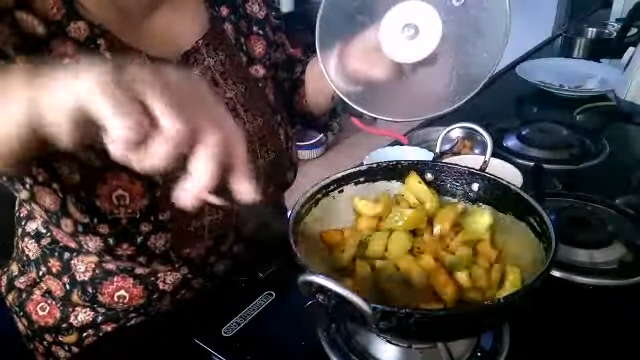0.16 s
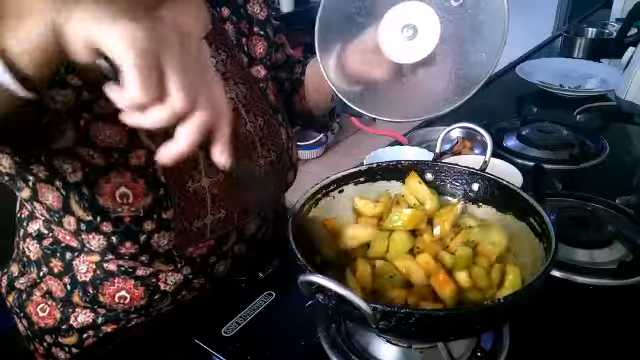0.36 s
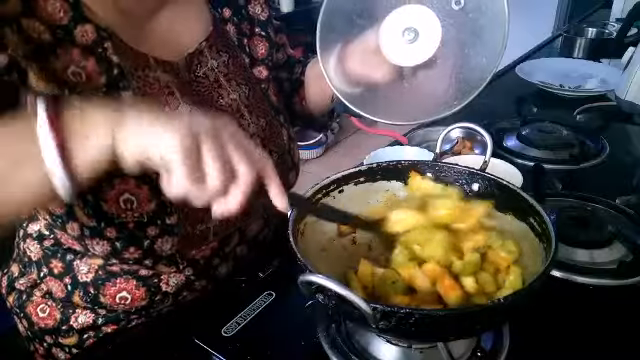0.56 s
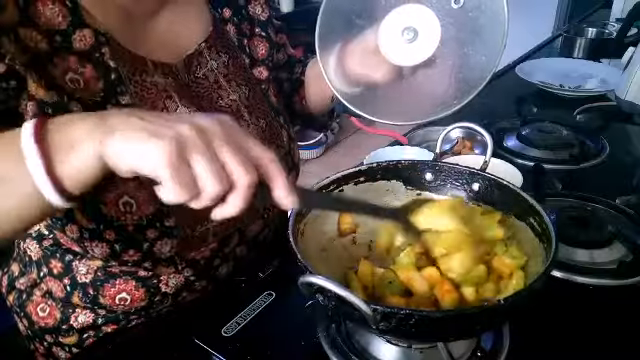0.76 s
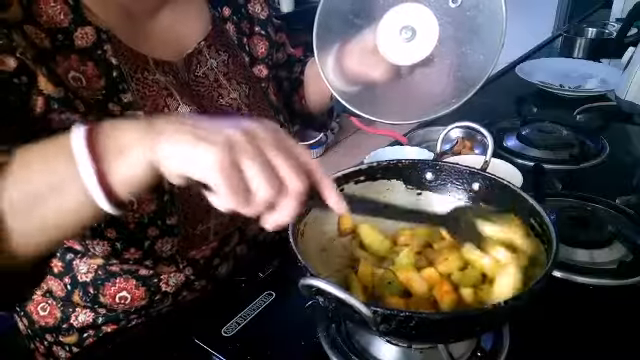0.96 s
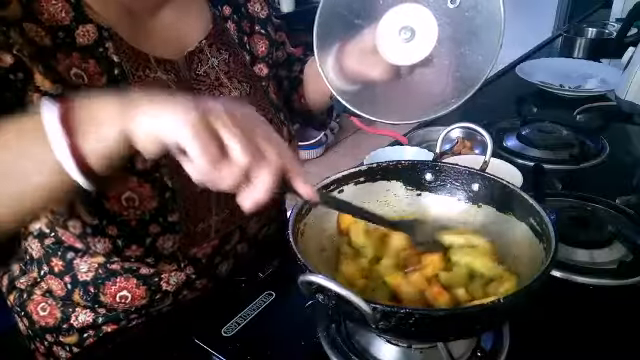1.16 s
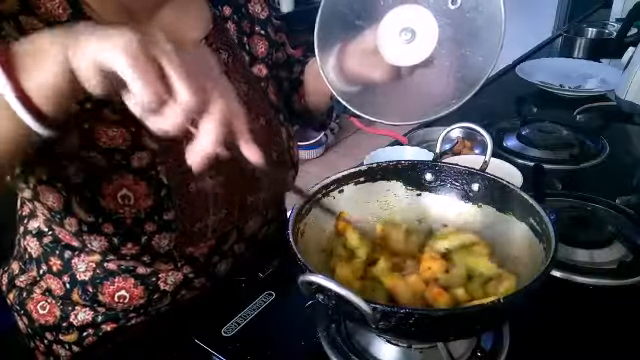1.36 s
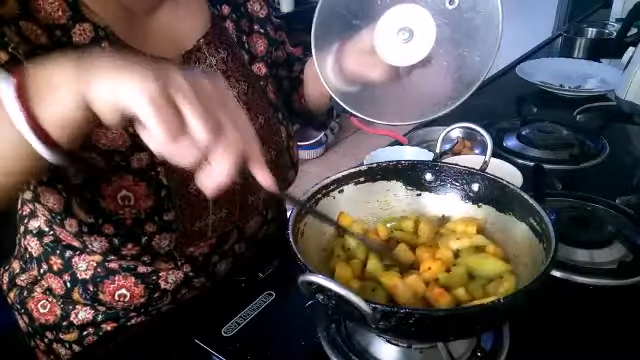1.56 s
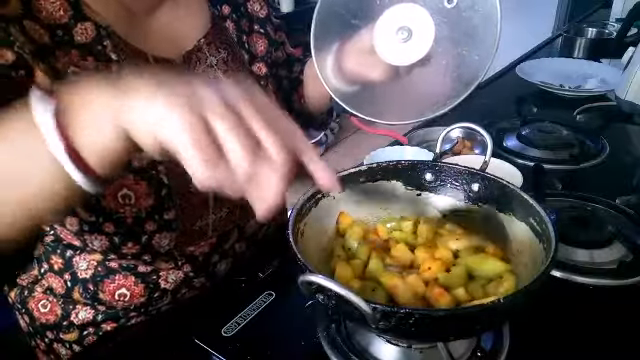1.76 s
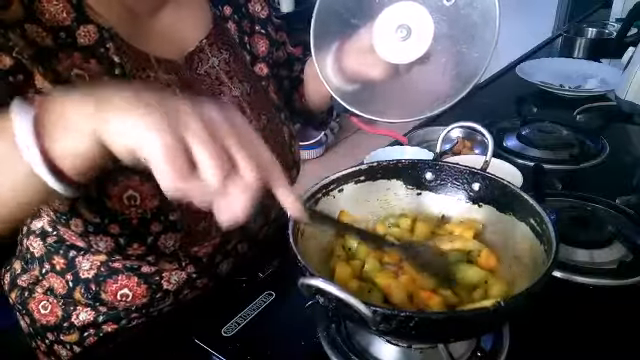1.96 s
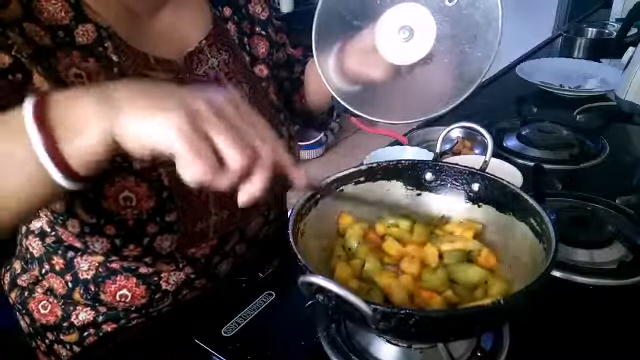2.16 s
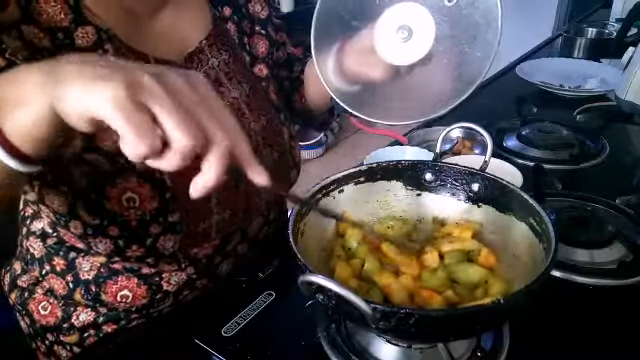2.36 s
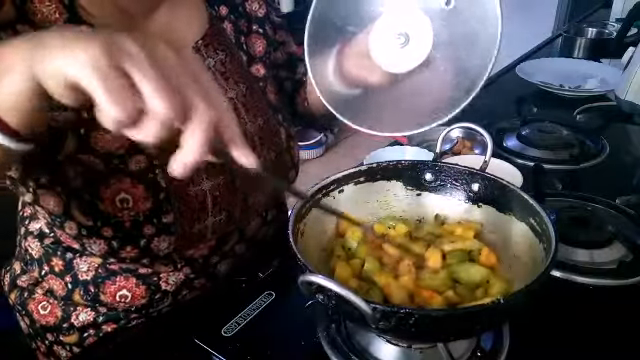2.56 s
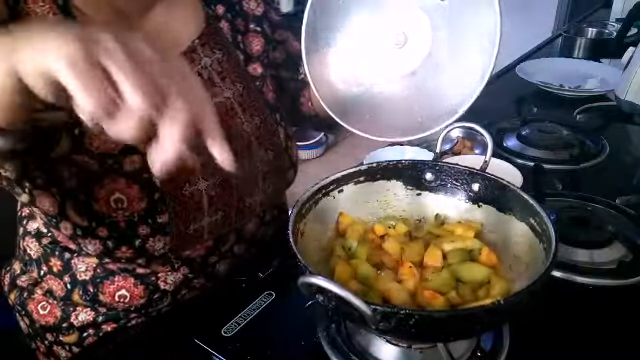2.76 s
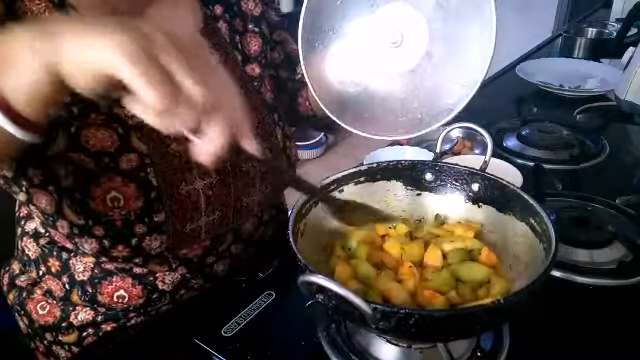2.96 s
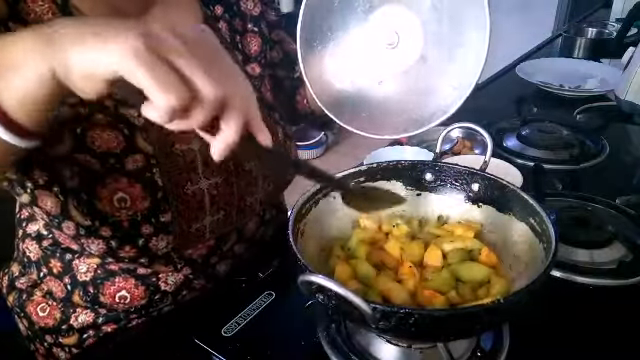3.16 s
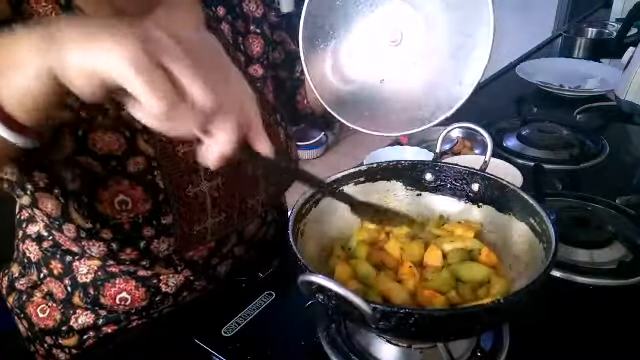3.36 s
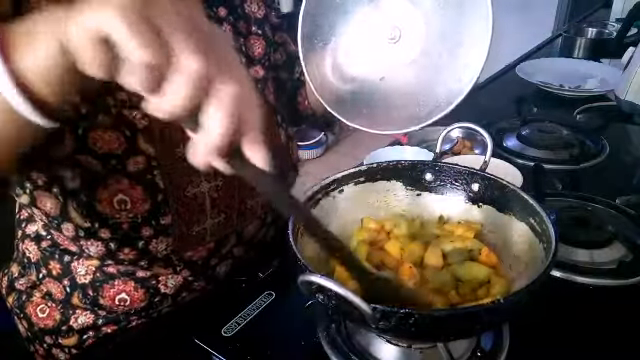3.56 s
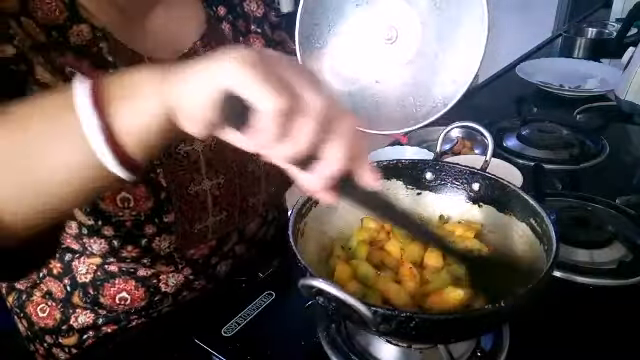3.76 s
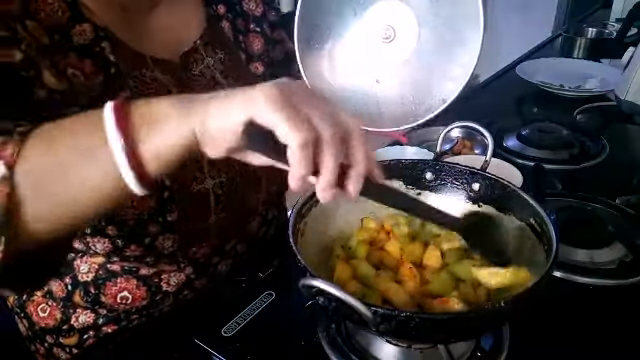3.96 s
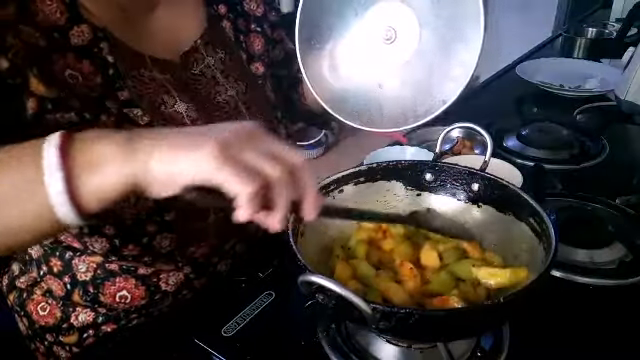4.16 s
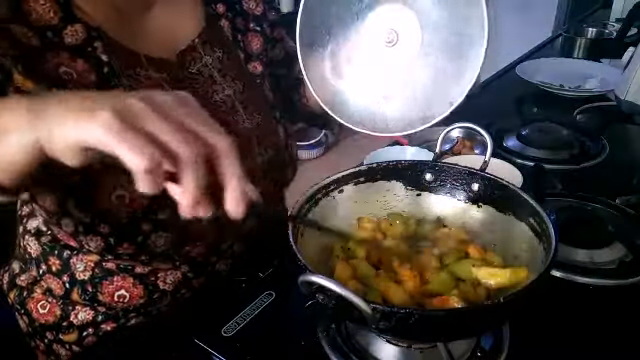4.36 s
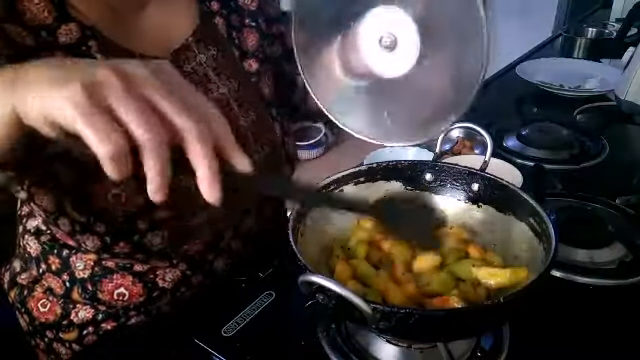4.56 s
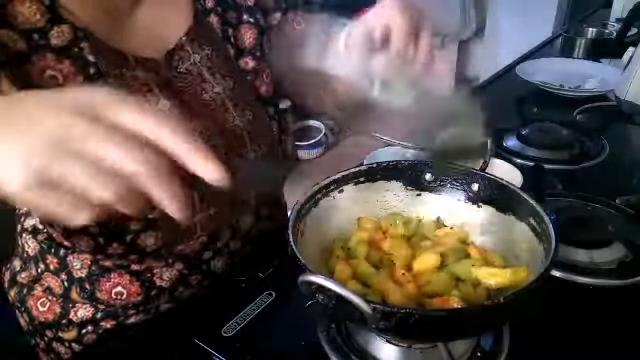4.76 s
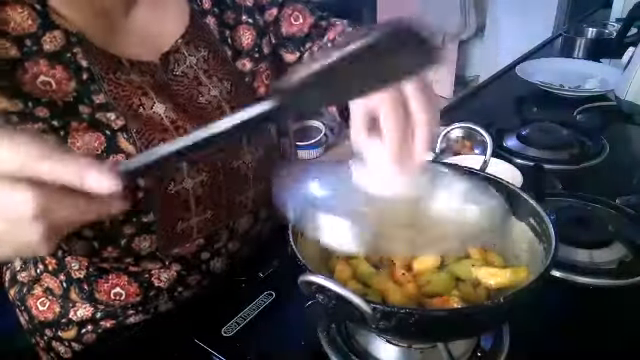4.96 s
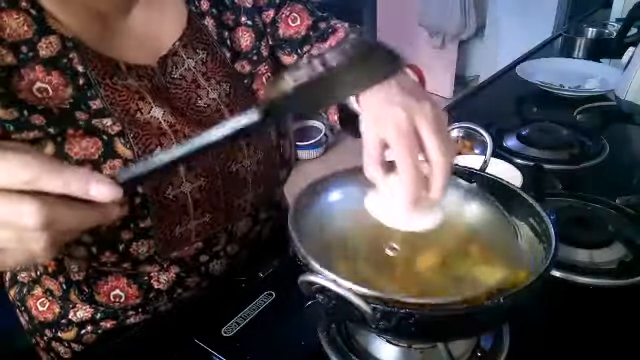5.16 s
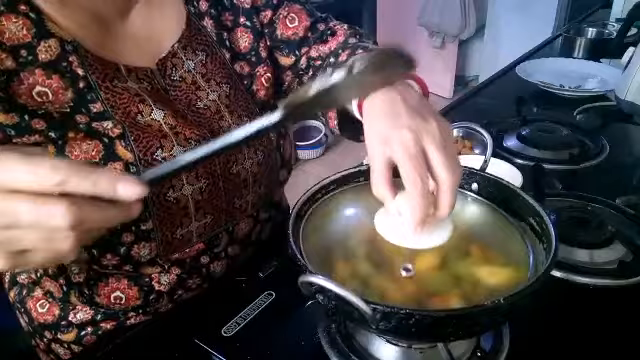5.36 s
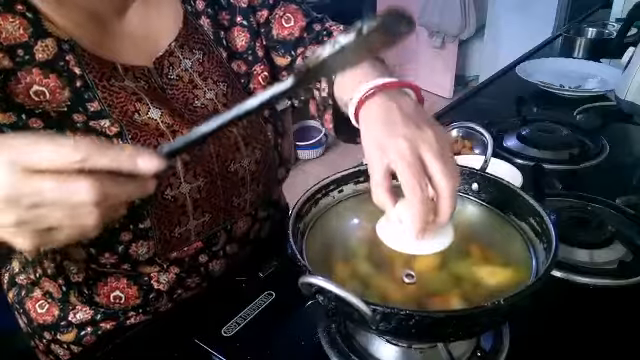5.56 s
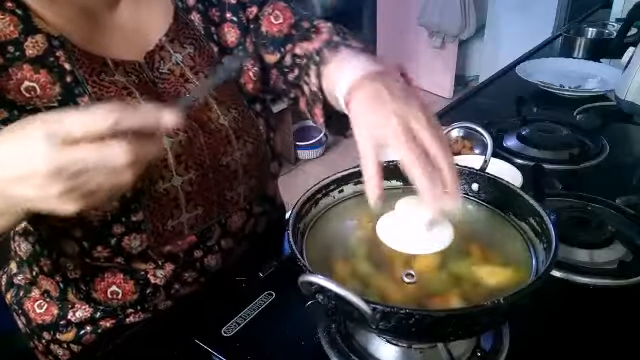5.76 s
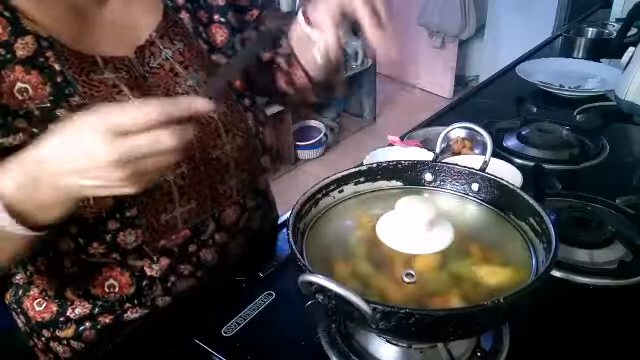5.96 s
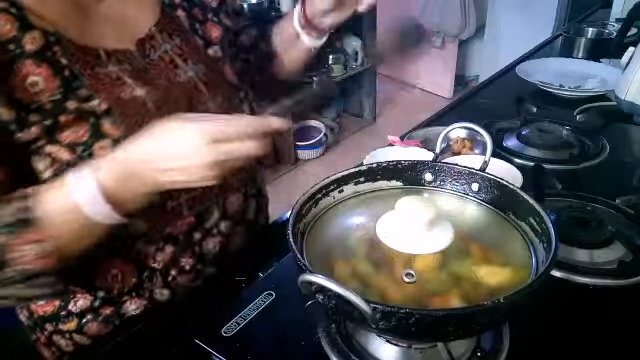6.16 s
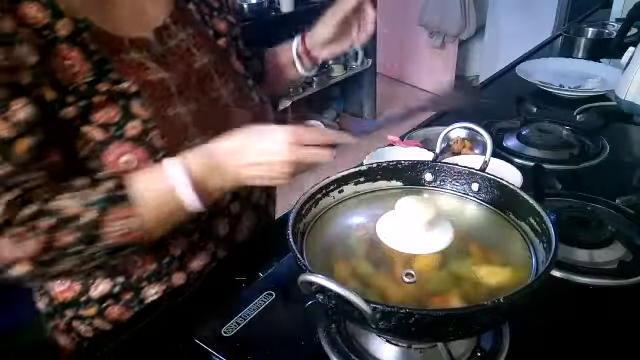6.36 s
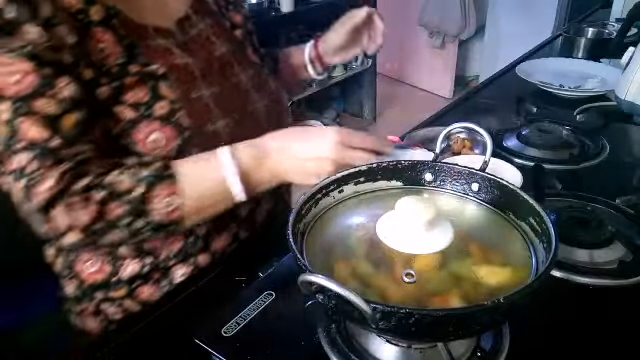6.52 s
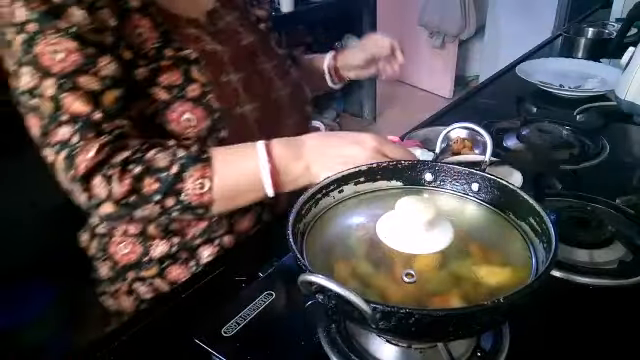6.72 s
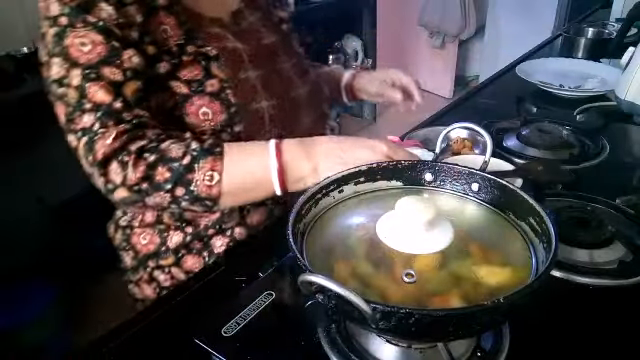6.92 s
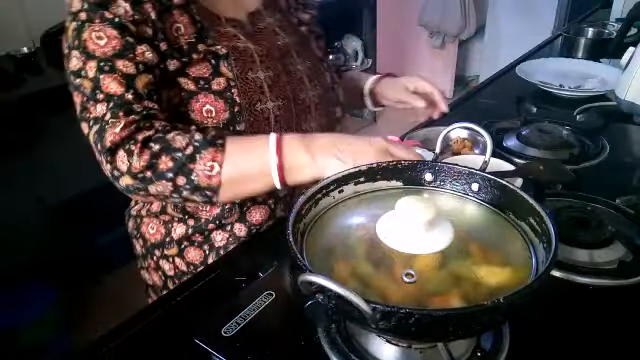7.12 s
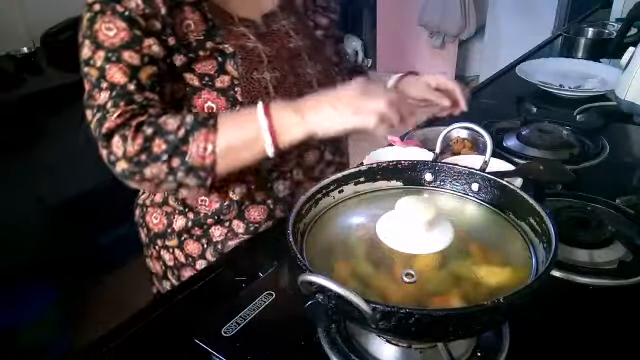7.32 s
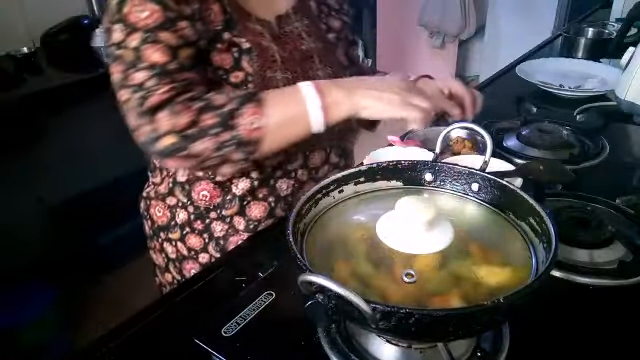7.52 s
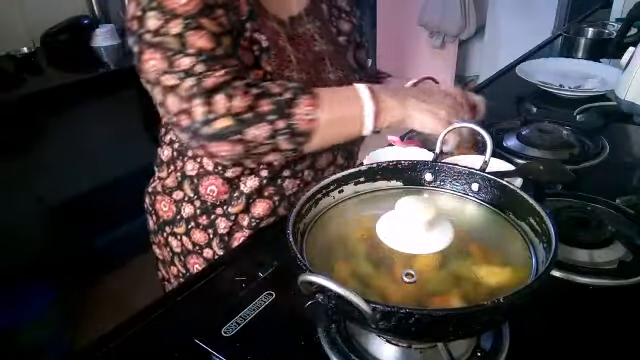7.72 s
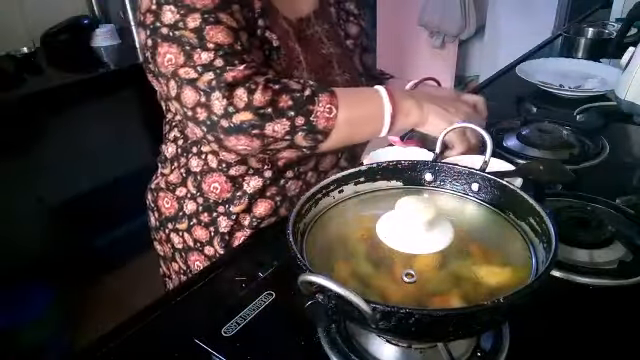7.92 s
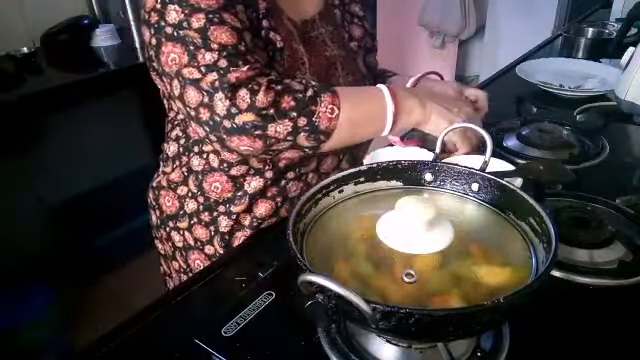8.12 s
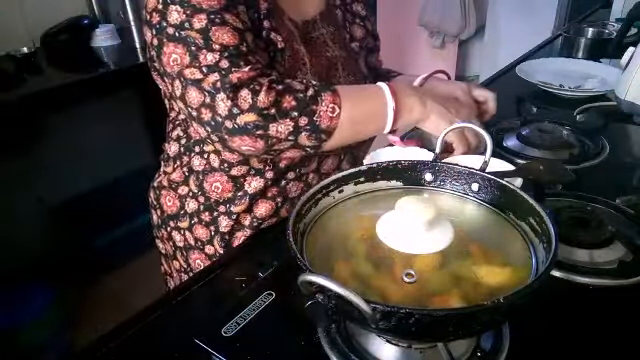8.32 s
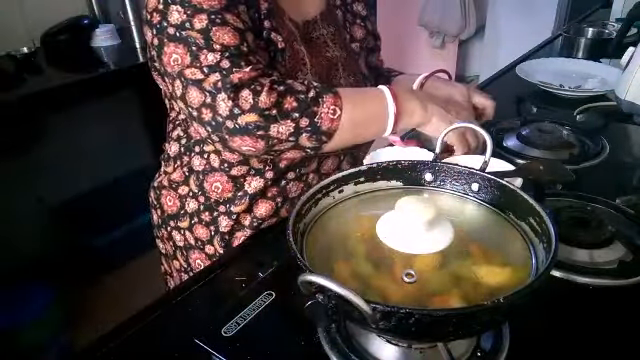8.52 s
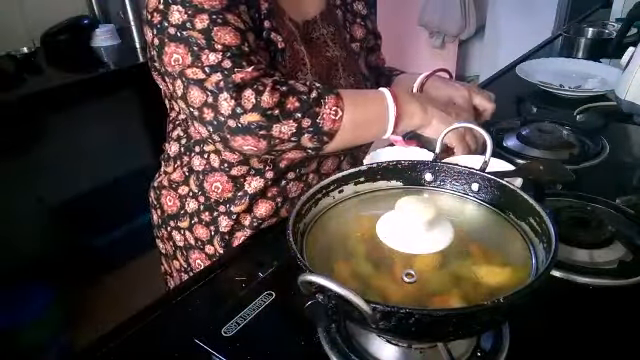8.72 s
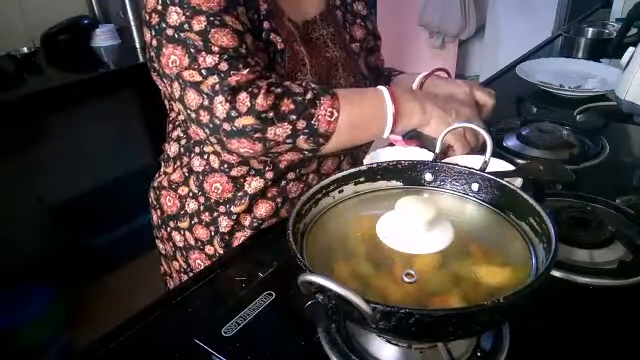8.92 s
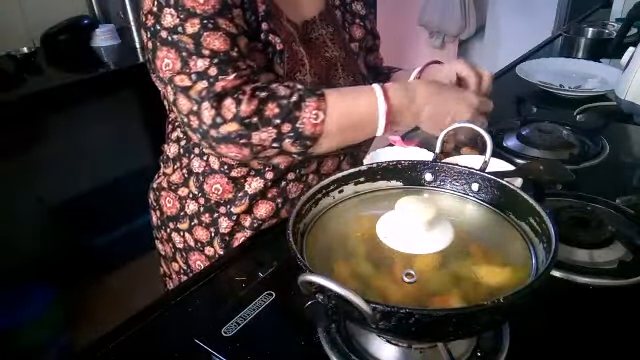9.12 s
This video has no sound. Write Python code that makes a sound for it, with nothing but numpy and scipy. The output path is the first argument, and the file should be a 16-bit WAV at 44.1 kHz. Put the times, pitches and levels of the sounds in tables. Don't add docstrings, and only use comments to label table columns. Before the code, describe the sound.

A home kitchen heard at arm's length through a small, nearly mono microphone. From 0 s vegetables fry in an open deep steel pan: a dense bright sizzle, strongest around 6 kHz with a fine spitting edge near 15 kHz, slowly easing, dotted with sharp pops. A spatula taps the ringing wall at 0.7, strongly at 1.15, again at 2.1 and 2.25, with duller bumps near 3 and 3.7 and a clear knock at 4.1. Around 5.05 a glass lid lands with clunks, slides and scrapes, sealing by 5.6; the sizzle falls sharply into a soft, hollow, bubbling simmer with muffled bursts. A bowl touches stone at 5.8, steam spits briefly at 6.2, and bowls knock at 6.9 to 7.05. Small dishes rattle lightly at 8.0 to 8.25 and 8.5 to 8.9, over low burner rumble until about 9.3 s.

```python
import sys
import numpy as np
from scipy import signal
from scipy.fft import rfft, irfft, next_fast_len
from scipy.io import wavfile
from scipy.ndimage import uniform_filter1d, map_coordinates

SR = 44100
rng = np.random.default_rng(int(sys.argv[2]) if len(sys.argv) > 2 else 0)


def dump(signal):
    limited = np.clip(np.atleast_2d(signal).T, -1, 1)
    pcm = np.round(limited * 32767).astype(np.int16)
    wavfile.write(sys.argv[1], SR, pcm)


def volts_from_decibels(level):
    exponent = np.asarray(level, float) / 20
    return 10 ** exponent


N = 409688


def unit(x):
    return x / np.sqrt(np.mean(x ** 2) + 1e-20)


def curves(rows):
    s, *cols = np.transpose(rows)
    return [np.interp(np.arange(N) / SR, s, c) for c in cols]


def wobble(rate):
    knots = rng.standard_normal(int(N * rate / SR) + 4)
    return map_coordinates(knots, [np.arange(N) * rate / SR])


def coloured(x, points):
    f, db = np.transpose(points)
    hz = np.fft.rfftfreq(4096, 1 / SR)
    gain_db = np.interp(np.log(hz + 1), np.log(f), db)
    cepstrum = irfft(np.log(volts_from_decibels(gain_db) + 1e-6))
    cepstrum[1:2048] *= 2
    cepstrum[2049:] = 0
    impulse = irfft(np.exp(rfft(cepstrum)))
    return signal.fftconvolve(x, impulse)[:len(x)]


def resonant(x, peaks):
    m = next_fast_len(N + SR // 4)
    f = np.fft.rfftfreq(m, 1 / SR)
    gain = sum(volts_from_decibels(db) * 1j * f * w / (c * c - f * f + 1j * f * w) for c, w, db in peaks)
    return irfft(rfft(x, m) * gain, m)[:N]


def ringing(modes, t, stretch):
    out = 0
    for hz, db, t60 in modes:
        scatter_db = rng.normal(0, 1.2)
        out = out + volts_from_decibels(db + scatter_db - 60 * t / (t60 * stretch)) * np.sin(2 * np.pi * hz * t)
    return out


# delay_s, level_db
PAN_ECHOES = [(.00105, -13), (.0018, -5), (.0022, -10.5), (.0041, -7.5)]


def in_pan(x):
    return x + sum(volts_from_decibels(db) * np.pad(x, (round(s * SR), 0))[:N] for s, db in PAN_ECHOES)


def bubbles():
    chance = 3000 / SR * volts_from_decibels(3 * wobble(30))
    size_db = np.minimum(3.9 * rng.exponential(1, N), 13)
    burst = (rng.random(N) < chance) * rng.choice([-1, 1], N) * volts_from_decibels(size_db)
    hiss = rng.standard_normal(N) * volts_from_decibels(1.02 * wobble(40))
    return unit(in_pan(unit(burst)) * volts_from_decibels(-8.5) + hiss) * volts_from_decibels(0.27 * wobble(9))


# start_s, level_db
VIGOUR = [(0, -33.5), (.25, -34), (.8, -36), (1.16, -35), (1.3, -35), (2.3, -38), (2.6, -37), (3.8, -39.5),
          (4.14, -39), (4.4, -39.5), (5.02, -40), (5.12, -44.5), (5.35, -46), (5.47, -45.5), (5.59, -56),
          (8.0, -56), (8.3, -56), (9.29, -58)]
# start_s, covered (0-1), sealed (0-1)
LID = [
    (0, 0.01, 0),
    (4.98, 0, 0.11),
    (5.06, 0.99, 0),
    (5.48, 0.92, 0.2),
    (5.6, 0.96, 0.98),
    (9.3, 0.93, 1.1),
]
# pitch_hz, level_db
SIZZLE = [(1350, -47.5), (2300, -13), (2600, -12.5), (3430, -6.5), (3720, -8), (3980, -6), (4780, -2.5),
          (6110, 2.5), (6870, -6), (7130, -11.5), (8260, -24), (10000, -32.5), (13000, -45), (22000, -120)]
# pitch_hz, level_db
SIZZLE_UNDER_GLASS = [(1700, -40), (2500, -15.5), (3100, -1), (4000, -4), (5000, -3.5), (6100, 2.5),
                      (6900, -10.5), (8100, -20), (8700, -26), (10000, -25), (13000, -42), (20000, -100)]
# pitch_hz, level_db
SPIT = [(9000, -41), (11500, -46.5), (13000, -36.5), (13800, -21), (14400, -6), (14800, -3.5), (15300, -9),
        (15750, -7)]
# pitch_hz, level_db
SIMMER = [(300, -72.5), (700, 2), (1300, 9.5), (2000, 11.5), (2600, -6.5), (3400, -31)]
# pitch_hz, level_db
SIMMER_UNDER_GLASS = [(400, -48), (700, -35), (1100, -36.5), (1400, -2.5), (1850, -3.5), (2250, 0.5),
                      (2600, 1), (3400, -31)]
# pitch_hz, width_hz, level_db
TRAPPED_AIR = [(690, 150, -6), (1465, 170, 5), (2270, 220, 0), (3050, 330, 0), (3330, 260, -4),
               (4010, 300, -1), (4520, 260, 0), (5010, 320, 0), (5450, 420, 1), (6080, 560, 1),
               (6850, 900, 0), (9500, 5000, 0)]
FRY_DB = 1
SPIT_DB, SPIT_SEAL_DB = -14, -5
SIMMER_DB, SIMMER_RISE_DB_PER_S = -20, 0.6448
SIMMER_COVER_DB, SIMMER_SEAL_DB = 5, 2.5
VENT_S, VENT_LENGTH_S, VENT_DB, VENT_SPIT_DB = 6.26, 0.06, 1.5, 6


def frying():
    t = np.arange(N) / SR
    vigour_db, = curves(VIGOUR)
    covered, sealed = curves(LID)
    covered = np.clip(covered, 0, 1)
    spurt = np.exp(-((t - VENT_S) / VENT_LENGTH_S) ** 2)
    stirred_s = np.cumsum(1 - covered) / SR
    free, trapped = bubbles(), resonant(bubbles(), TRAPPED_AIR)

    def blend(open_colour, glass_colour):
        in_open = np.sqrt(1 - covered) * unit(coloured(free, open_colour))
        return in_open + np.sqrt(covered) * unit(coloured(trapped, glass_colour))

    simmer_db = SIMMER_DB + SIMMER_RISE_DB_PER_S * stirred_s
    simmer_db = simmer_db + SIMMER_COVER_DB * covered + SIMMER_SEAL_DB * sealed
    simmer = volts_from_decibels(simmer_db) * blend(SIMMER, SIMMER_UNDER_GLASS)
    finest = 0.63 * free + 0.71 * bubbles()
    spit_db = SPIT_DB + SPIT_SEAL_DB * sealed + VENT_SPIT_DB * spurt
    spit_db = spit_db + 6.0 + 1.1 * wobble(36) + 2.0 * wobble(4.9)
    spit = volts_from_decibels(spit_db) * unit(coloured(finest, SPIT))
    sizzle = blend(SIZZLE, SIZZLE_UNDER_GLASS)
    return volts_from_decibels(vigour_db + FRY_DB + VENT_DB * spurt) * (sizzle + simmer + spit)


# pitch_hz, level_db
RUMBLE = [(15, -51), (25, -35.5), (70, 2.5), (103, -3.5), (167, 4.5), (221, -1.5), (313, -5.5), (330, -1.5),
          (430, -42.5), (730, -120)]
# pitch_hz, level_db
SCRAPE = [(150, -29), (300, -5.5), (450, 5.5), (700, -5.5), (900, -16), (1200, -14.5), (1600, -43)]
# start_s, length_s, rumble_db, scrape_db
DRAGS = [
    (0, 0.02, -53, -66.5),
    (5.065, 0.037, -53.5, -55.5),
    (5.214, 0.053, -58.5, -63),
    (5.414, 0.14, -71, -62),
    (5.555, 0.049, -62, -64),
    (5.902, 0.094, -68.5, -73),
    (7.007, 0.16, -73, -75),
    (8.16, .14, -62, -74.5),
    (8.717, 0.054, -68, -77),
    (8.885, 0.013, -63, -84.5),
]
ROOM_DB, ROOM_SWING_DB = -74, 2.5
SHUFFLE_DB, SHUFFLE_SWING_DB = -81.5, 3
COVERED_RUMBLE_DB = 4


def kitchen():
    t = np.arange(N) / SR
    covered = curves(LID)[0]
    low = volts_from_decibels(ROOM_DB + COVERED_RUMBLE_DB * covered + ROOM_SWING_DB * wobble(7))
    high = volts_from_decibels(SHUFFLE_DB + SHUFFLE_SWING_DB * wobble(9))
    for s, length, rumble_db, scrape_db in DRAGS:
        swell = np.exp(-((t - s) / length) ** 2)
        low = np.hypot(low, volts_from_decibels(rumble_db) * swell)
        high = np.hypot(high, volts_from_decibels(scrape_db) * swell)
    rumble = low * volts_from_decibels(1.1 * wobble(45)) * unit(coloured(rng.standard_normal(N), RUMBLE))
    scrape = high * volts_from_decibels(2.0 + 2.7 * wobble(30)) * unit(coloured(rng.standard_normal(N), SCRAPE))
    return rumble + scrape


# start_s, level_db, stove_thud_db
TAPS = [(0.001, -61.5, 15.5), (0.679, -54, -19), (1.129, -48.5, -28), (1.154, -30.5, -7.5),
        (1.169, -36.5, -9), (2.082, -39, -8.5), (2.248, -34, -8.5), (2.84, -66, 14.5), (3.045, -59.5, 10.5),
        (3.975, -59, 7), (4.117, -30, -13), (4.217, -45, -16), (4.29, -57.5, 4)]
# start_s, level_db, pitch_hz, stove_thud_db
BUMPS = [(2.935, -51.5, 318, -32), (3.025, -50, 688, -19), (3.075, -51, 547, -4), (3.719, -40, 604, -16),
         (3.731, -37.5, 508, -4), (3.799, -53.5, 720, 0), (4.431, -50.5, 483, -27), (4.965, -48, 616, -34),
         (4.754, -41.5, 308, -11.5), (5.027, -33.5, 674, -24), (5.05, -30.5, 690, -19),
         (5.158, -42, 620, -14), (5.29, -47.5, 544, -8), (5.537, -51, 420, -3.5)]
# start_s, level_db, pitch_hz, stove_thud_db
BOWLS = [
    (5.783, -48, 1160, -18),
    (6.882, -41.5, 597, -31),
    (6.884, -47.5, 1660, -32),
    (7.045, -41, 1040, -31),
    (7.062, -48, 374, -25),
]
# pitch_hz, level_db, t60_s
PAN = [(654, 2, 0.063), (730, -14, 0.4), (817, -8, 0.34), (1040, -11, 0.066), (1190, -11, 0.022),
       (1600, 0.5, 0.075), (2050, -13, 0.05), (2406, -2, 0.15)]
# pitch_hz, level_db, t60_s
PAN_BODY = [(366, -1.5, 0.2), (418, -4, 0.032), (517.4, 3.5, 0.12)]
# pitch_hz, level_db, t60_s
STOVE = [(86, -8, .6), (128, 0, .55), (169, -9, .4)]
TAP_HZ, TAP_RING = 1119, (-7, -9.5, 0.13)
BUMP_RING = (-8.5, -12, 0.17)
BOWL_RING = (-15, -11.5, 0.14)


def knocks():
    out, t = np.zeros(N + SR), np.arange(SR // 2) / SR
    shake = np.pad(volts_from_decibels(1.5 * wobble(40)), (0, SR))
    chatter = np.pad(volts_from_decibels(4 * wobble(90)), (0, SR))
    contacts = [(s, db, TAP_HZ, thud_db, *TAP_RING) for s, db, thud_db in TAPS]
    contacts += [(*row, *BUMP_RING) for row in BUMPS]
    contacts += [(*row, *BOWL_RING) for row in BOWLS]
    for s, db, hz, thud_db, ring_db, body_db, t60 in contacts:
        here = slice(round(s * SR), round(s * SR) + len(t))
        note = volts_from_decibels(-60 * t / (0.51 * t60)) * np.sin(2 * np.pi * hz * t)
        dull = [(200, -30), (hz, 0), (2500, -14), (5000, -40)]
        scatter = unit(coloured(rng.standard_normal(len(t)), dull))
        ring = volts_from_decibels(ring_db) * ringing(PAN, t, t60 / 0.15)
        ring = ring + volts_from_decibels(body_db - 4.5) * ringing(PAN_BODY, t, t60 / 0.089)
        rattle = (volts_from_decibels(-8.5 - 60 * t / (2.1 * t60)) + volts_from_decibels(-10.5 - 60 * t / 0.0055)) * scatter
        thud = volts_from_decibels(thud_db) * ringing(STOVE, t, 1.015) * (1 - np.exp(-t / 0.006)) * shake[here]
        strike = (note + ring * chatter[here] + rattle) * (1 - np.exp(-t / 0.00021))
        out[here] += volts_from_decibels(db - 6.5) * (strike + thud)
    return out[:N]


# start_s, level_db
POPS = [(0.2194, -8.5), (0.352, -22.5), (0.3845, -8), (0.6085, -7.5), (0.9981, -27), (1.3994, -13),
        (2.447, -13.5), (2.5287, -5), (2.681, -10), (2.7716, -21), (3.521, -22.5), (3.6262, -4.5),
        (3.6933, -14), (3.7095, -23.5), (3.9863, -20), (4.0342, -14), (4.2373, -22.5), (5.0295, -10),
        (5.12, -17.5), (5.339, -23.5)]
# start_s, level_db
MUFFLED = [(5.7753, -39), (6.344, -29.5), (6.601, -31), (6.8692, -30.5), (7.0903, -24.5), (7.307, -30.5),
           (7.3664, -24.5), (7.445, -26), (7.9369, -29), (8.0097, -26), (8.204, -25), (8.316, -26),
           (8.5964, -28.5), (9.1296, -29.5)]
# start_s, level_db
SPLASHES = [
    (6.2043, -22.5),
    (6.2307, -25.5),
    (6.248, -22),
    (6.2801, -29.5),
    (6.3015, -24),
    (8.05, -25),
    (8.245, -23),
]
POP_SPIT_DB, MUFFLED_SPIT_DB, SPLASH_SPIT_DB = -23.5, -25.5, -12.5


def pops():
    low, high = np.zeros((2, N))
    for rows, spit_db in ((POPS, POP_SPIT_DB), (MUFFLED, MUFFLED_SPIT_DB), (SPLASHES, SPLASH_SPIT_DB)):
        for s, db in rows:
            low[round(s * SR)] = volts_from_decibels(db + 5.5)
            high[round(s * SR)] = volts_from_decibels(db + spit_db + 20)
    return coloured(in_pan(low), SIZZLE) + coloured(in_pan(high), SPIT)


# start_s, level_db, pitch_hz, treble_db
RATTLE = [(8.0119, -50, 1740, 3), (8.0206, -55.5, 1810, -10), (8.0545, -44, 1480, -8),
          (8.1169, -43.5, 1346, -2), (8.1606, -53.5, 1680, -5), (8.2003, -45.5, 1910, -0.5),
          (8.244, -50.5, 1660, -3), (8.5027, -44.5, 1700, -2), (8.5942, -45.5, 1760, -6),
          (8.656, -57.5, 1900, 0), (8.6813, -52, 1400, -3), (8.6898, -42, 1550, -2.5),
          (8.7103, -52, 1680, -2), (8.734, -46.5, 1557, 4), (8.7614, -61, 1590, -4),
          (8.8952, -46, 1570, -0.5)]
# pitch_hz, level_db
DISH = [(300, -52), (600, -14.5), (1100, -10.5), (1500, -4.5), (2600, -8), (3400, -12.5), (4500, -60.5)]
# pitch_hz, level_db
CLINK = [(2500, -21), (3600, 7.5), (5800, 12), (7000, 0), (9000, -42)]
RATTLE_T60_S, ROOM_T60_S, ROOM_SHARE_DB = 0.046, 0.58, -4


def dishes():
    out, t = np.zeros(N + SR), np.arange(SR // 3) / SR
    for s, db, hz, treble_db in RATTLE:
        body = unit(coloured(rng.standard_normal(len(t)), DISH))
        clink = unit(coloured(rng.standard_normal(len(t)), CLINK))
        note = 0.83 * volts_from_decibels(-60 * t / 0.18) * np.sin(2 * np.pi * hz * t)
        crack = 0.69 * volts_from_decibels(-60 * t / 0.01)
        ring = 0.68 * volts_from_decibels(-60 * t / RATTLE_T60_S)
        room = volts_from_decibels(ROOM_SHARE_DB - 60 * t / ROOM_T60_S) * (1 - np.exp(-t / 0.0038))
        scatter = (crack + ring + room) * (body + volts_from_decibels(treble_db + 2.5) * clink)
        out[round(s * SR):][:len(t)] += volts_from_decibels(db - 8.0) * (note + scatter)
    return out[:N]


def scene():
    mid = frying() + kitchen() + knocks() + pops() + dishes()
    smear = rng.standard_normal(SR // 50)
    side = volts_from_decibels(-20) * signal.fftconvolve(mid, smear / np.linalg.norm(smear))[:N]
    return np.array([mid + side, mid - side])


# pitch_hz, level_db
BAND_LIMIT = [(60, -10.5), (250, -19), (500, -20.5), (1000, -20), (1800, -20.5), (3000, -22), (6000, -24),
              (8500, -26.5), (11000, -26), (13500, -34.5), (14300, -33), (15700, -26.5)]
BANDS = np.r_[0:40:4, 40:96:8, 96:144:12, 144, 160, 176, 196, 216, 240, 264, 292, 320:736:32, 735]
# start_s, length_s
SUDDEN = [
    (.68, .035),
    (2.93, .04),
    (3.595, .04),
    (6.19, .15),
    (8.2, .06),
    (8.31, .04),
]


def without_faint_bands(dry):
    pair = np.pad([dry[0] + dry[1], dry[0] - dry[1]], ((0, 0), (35, 0))) / 2
    hz, t, z = signal.stft(pair, SR, "cosine", 2048)
    width = np.diff(BANDS)
    power = np.add.reduceat(abs(z[0]) ** 2, BANDS)[:-1] / width[:, None]
    level = 10 * np.log10(power + 1e-20)
    centre = hz[(BANDS[1:] + BANDS[:-1]) // 2]
    f, db = np.transpose(BAND_LIMIT)
    limit = level.max(0) + np.interp(np.log(centre), np.log(f), db)[:, None]
    luck = 2.34 * rng.standard_normal(len(t))
    luck = luck + 2.8 * uniform_filter1d(rng.standard_normal(level.shape), size=2, axis=1)
    limit += luck * np.clip(centre / 900, 0.3, 1)[:, None]
    keep = np.clip((level - limit) / 0.71, 0, 1)
    for s, length in SUDDEN:
        keep[:, (t > s) & (t < s + length)] = 1
    keep = np.array([keep, keep * (rng.random(len(t)) < 0.35)])
    gain = np.repeat(keep, width, 1)
    gain = np.pad(gain, ((0, 0), (0, len(hz) - BANDS[-1]), (0, 0)))
    mid, side = signal.istft(z * gain, SR, "cosine", 2048)[1][:, 35:N + 35]
    return np.array([mid + side, mid - side])


def top_cut(x):
    return signal.sosfilt(signal.butter(12, 15740, fs=SR, output="sos"), x)


def record(dry):
    mix = without_faint_bands(dry)
    return top_cut(mix)


dry = scene()
out = record(dry)
dump(out)
```